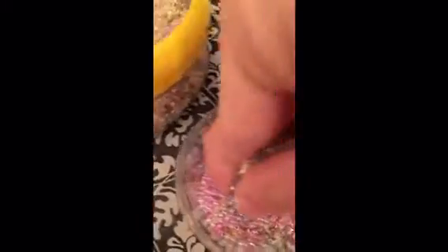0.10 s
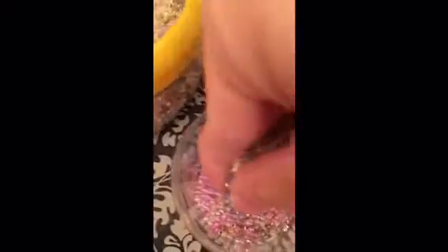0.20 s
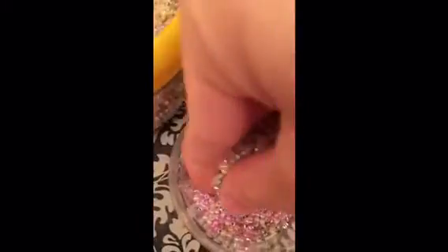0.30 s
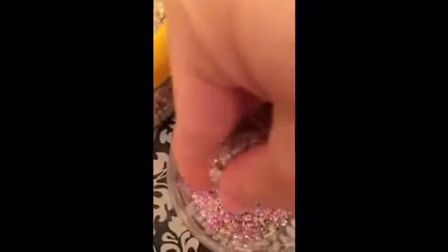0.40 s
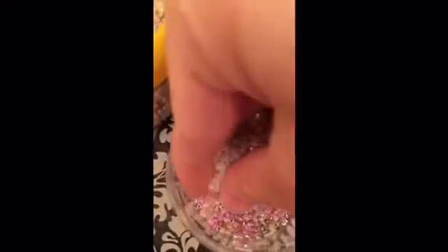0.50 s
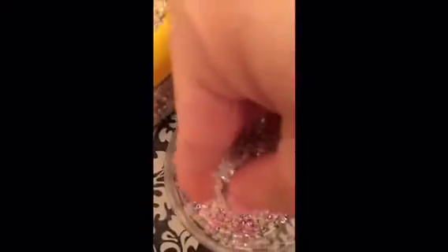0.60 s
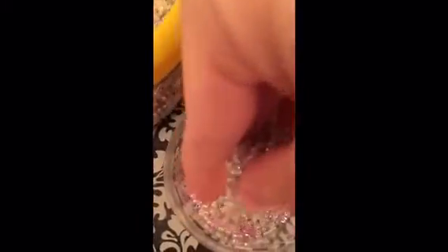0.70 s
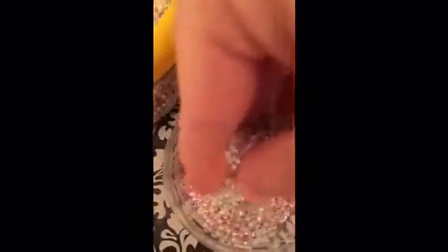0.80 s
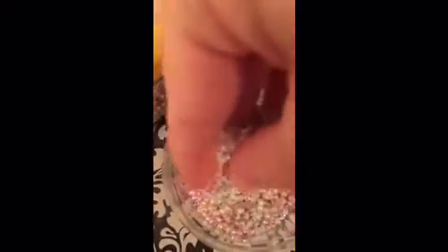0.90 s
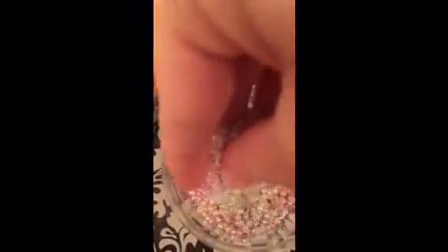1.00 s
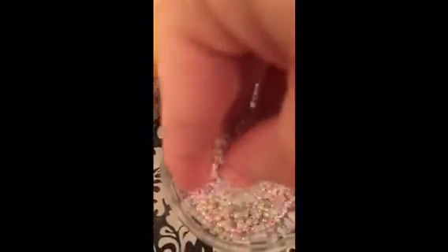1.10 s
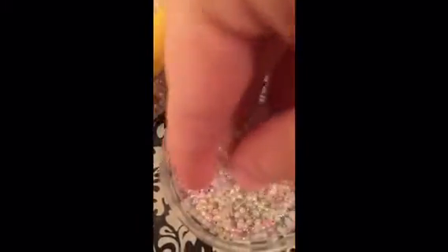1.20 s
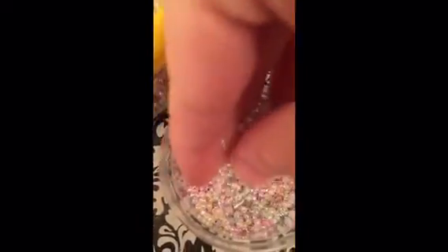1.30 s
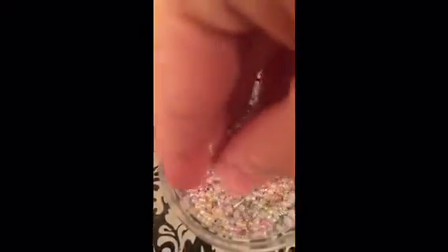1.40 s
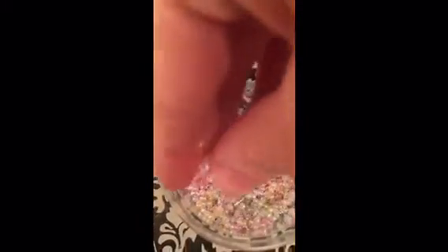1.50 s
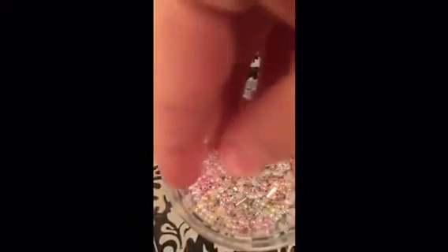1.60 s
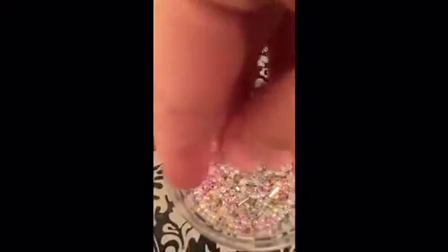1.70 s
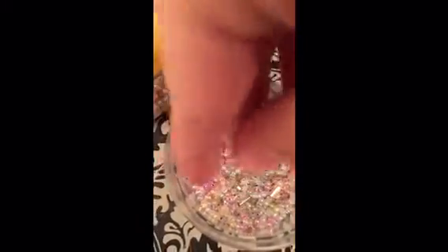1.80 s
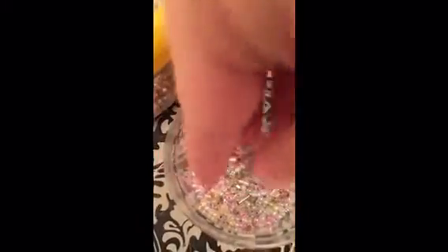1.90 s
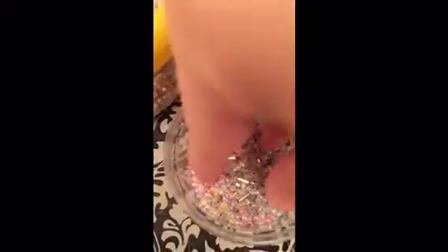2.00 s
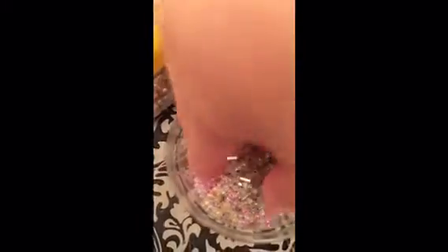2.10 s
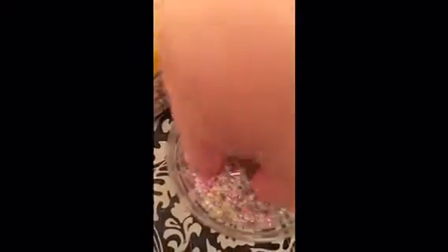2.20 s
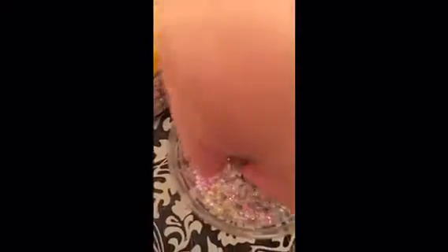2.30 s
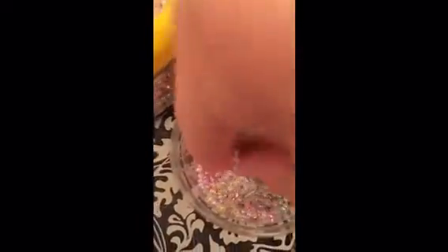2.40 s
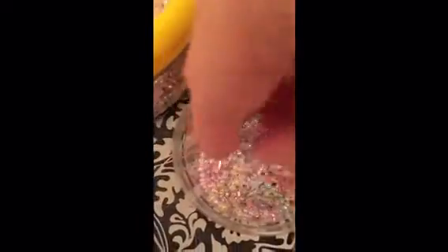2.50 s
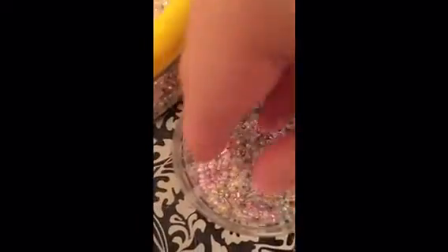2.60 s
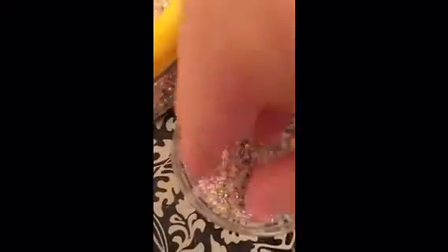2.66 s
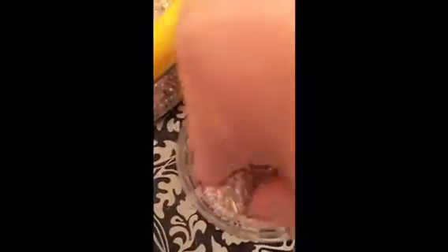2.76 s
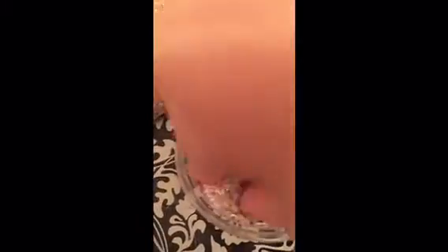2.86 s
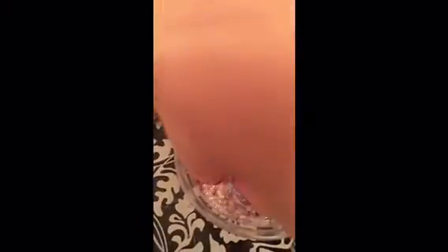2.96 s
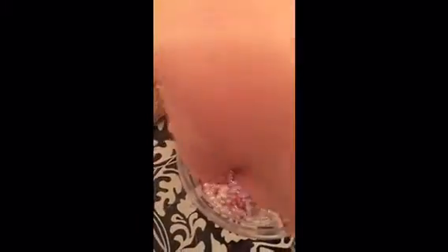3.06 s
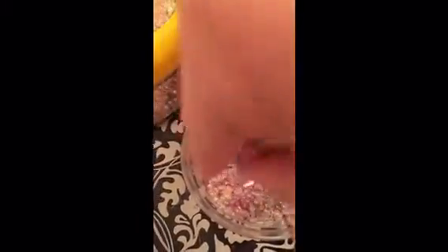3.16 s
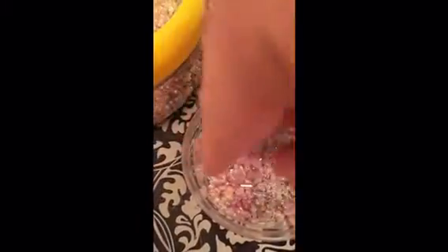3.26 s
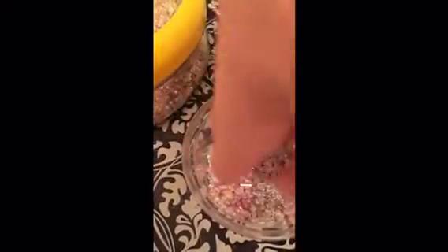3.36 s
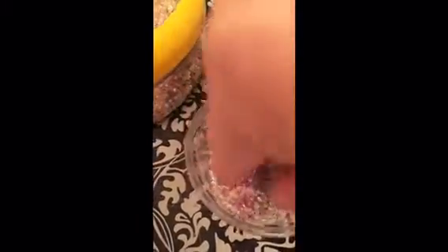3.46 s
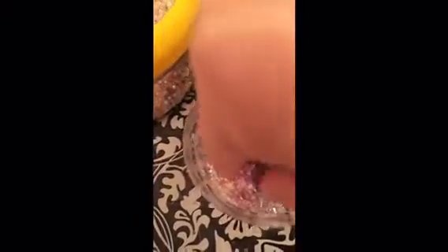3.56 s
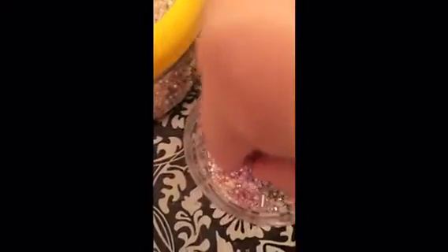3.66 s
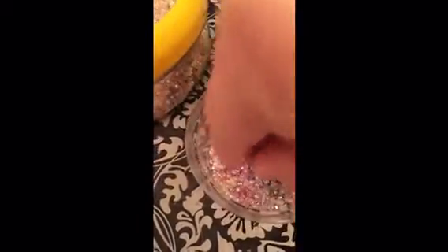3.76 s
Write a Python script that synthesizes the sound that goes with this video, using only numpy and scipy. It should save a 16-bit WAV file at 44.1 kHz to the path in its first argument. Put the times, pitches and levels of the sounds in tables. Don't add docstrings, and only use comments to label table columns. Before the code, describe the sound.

Close up in a quiet indoor room, little beads patter brightly onto beads and glass for under two seconds, then a hand stirs them in separate rustling, clicking strokes with dull fingertip thumps.

```python
import sys
import numpy as np
from scipy import signal
from scipy.fft import rfft, irfft
from scipy.io import wavfile
from scipy.ndimage import uniform_filter1d

SR = 44100
rng = np.random.default_rng(int(sys.argv[2]) if len(sys.argv) > 2 else 0)


def to_wav(sig):
    pcm = np.clip(np.atleast_2d(sig), -1, 1) * 32767
    pcm = np.round(pcm).astype(np.int16)
    wavfile.write(sys.argv[1], SR, pcm.T)


def volts_from_db(level):
    exponent = np.asarray(level, float) / 20
    return 10 ** exponent


N = 169785
CONTACT_SAMPLES = 512


def evened(x):
    return x / np.sqrt(np.mean(x ** 2) + 1e-20)


def coloured(x, points):
    table_hz, table_db = np.transpose(points)
    hz = np.fft.rfftfreq(x.shape[-1], 1 / SR)
    gain_db = np.interp(np.log(hz + 1), np.log(table_hz), table_db)
    return irfft(rfft(x) * volts_from_db(gain_db), x.shape[-1])


def filtered(x, order, hz, kind):
    return signal.sosfilt(signal.butter(order, hz, kind, fs=SR, output="sos"), x)


def drift(hz):
    noise = uniform_filter1d(rng.standard_normal(N), size=60)
    return evened(signal.lfilter([1], [1, -np.exp(-2 * np.pi * hz / SR)], noise))


def unit_energy(templates):
    return templates / np.linalg.norm(templates, axis=1, keepdims=True)


# freq_hz, level_db_per_hz
BEAD_COLOUR = [(900, -53), (2000, -19), (3500, -9.5), (6000, -0.5), (8500, 3), (11000, -4.5), (15500, -5)]


def bead_snaps(count):
    rattle_s, after_db, own_colour_db = 0.00028, -10, 2.5
    n = np.arange(CONTACT_SAMPLES)
    t = n / SR
    decay_s = rattle_s * rng.uniform(0.6, 1.6, (count, 1))
    decay = np.exp(-t / decay_s) + volts_from_db(after_db) * np.exp(-t / decay_s / 5)
    raw = np.roll(rng.standard_normal((count, CONTACT_SAMPLES)) * decay, 24, axis=1)
    own = evened(uniform_filter1d(rng.standard_normal((count, 257)), size=40, axis=1))
    raw = irfft(rfft(raw) * volts_from_db(own_colour_db * own), CONTACT_SAMPLES)
    snap = np.roll(coloured(raw, BEAD_COLOUR), -16, axis=1)
    fade_in, fade_out = np.minimum(n / 8, 1), np.minimum((CONTACT_SAMPLES - n) / 64, 1)
    return unit_energy(snap * fade_in * fade_out)


# freq_hz, width_hz, level_db
WALL_MODES = [(2050, 300, -4), (2450, 280, 4), (3500, 300, 1), (4400, 400, -4)]


def wall_knocks(count):
    spread_db, tuning_spread, low_cut_hz = 4, 0.061, 1540
    t = np.arange(CONTACT_SAMPLES)[:, None, None] / SR
    hz, width_hz, level_db = np.transpose(WALL_MODES)
    weight, tuning = rng.standard_normal((2, count, len(hz)))
    decay = volts_from_db(level_db + spread_db * weight) * np.exp(-np.pi * width_hz * t)
    modes = decay * np.sin(2 * np.pi * hz * (1 + tuning_spread * tuning) * t)
    return unit_energy(filtered(modes.sum(2).T, 2, low_cut_hz, "high"))


def contact_sound(train, knock, count=32):
    pick, out = rng.integers(0, count, N), np.zeros(N)
    varied_knock = knock * volts_from_db(2 * rng.standard_normal(N))
    for k, (snap, ring) in enumerate(zip(bead_snaps(count), wall_knocks(count))):
        out += signal.oaconvolve(train * (pick == k), snap)[:N]
        out += signal.oaconvolve(varied_knock * (pick == k), ring)[:N]
    return filtered(out, 4, 1030, "high")


def clumped_contacts(table, per_s, growth, size_db, clump_db, knock_db):
    edge_db = -30
    biggest = 2.6
    t, power = np.arange(N) / SR, np.full(N, 1e-12)
    for start_s, rise_s, hold_s, fall_s, level_db in table:
        before = (start_s + rise_s - t) / rise_s
        after = (t - start_s - rise_s - hold_s) / fall_s
        edge = np.maximum(np.maximum(before, after), 0)
        power += volts_from_db(2 * (level_db + edge_db * edge)) * (t > start_s)
    rate = per_s * (power / 0.0017) ** (growth / 2)
    clump = volts_from_db(clump_db * drift(40))
    size = volts_from_db(size_db * np.minimum(rng.exponential(1, N), biggest)) * rng.choice([-1, 1], N)
    hit = rng.random(N) < rate * clump / clump.mean() / SR
    train = hit * evened(size) * np.sqrt(power * SR / rate)
    return np.array([train, train * volts_from_db(knock_db)])


# start_s, rise_s, hold_s, fall_s, level_db
SHOWER_MOVES = [(.213, 0.0026, 0.0094, 0.018, -52), (.388, 0.0015, 0.0045, 0.0097, -20.5),
                (.43, 0.0063, 0.03, 0.065, -24), (.495, 0.017, 0.11, 0.033, -27.5),
                (.59, 0.02, 0.2, 0.25, -25.5), (.82, 0.02, 0.046, 0.078, -33),
                (.962, 0.021, 0.013, 0.082, -45), (1.003, 0.014, 0.098, 0.35, -22.5),
                (1.13, 0.037, 0.07, 0.084, -30), (1.25, 0.0095, 0.069, 0.03, -34),
                (1.34, 0.01, 0.057, 0.0192, -40), (1.468, 0.0072, 0.066, 0.053, -45),
                (1.543, 0.0013, 0.03, 0.15, -23), (1.655, 0.0045, 0.058, .012, -47),
                (1.85, 0.0017, 0.042, 0.0095, -48.5)]


def showers():
    return clumped_contacts(SHOWER_MOVES, per_s=4483, growth=0.97, size_db=7.5, clump_db=2, knock_db=-15)


# start_s, rise_s, hold_s, fall_s, level_db
STROKE_MOVES = [(2.056, 0.0047, 0.037, 0.086, -32.5), (2.07, 0.025, 0.027, 0.61, -40.5),
                (2.2, 0.021, 0.068, 0.13, -35.5), (2.34, 0.015, 0.23, 0.11, -42),
                (2.44, 0.083, 0.0068, 0.063, -26.5), (2.56, 0.01, 0.01, 0.026, -51),
                (2.64, 0.0023, 0.0029, 0.035, -48), (2.67, 0.0024, 0.0081, 0.042, -41.5),
                (2.742, 0.0021, 0.002, 0.035, -38.5), (2.772, 0.0024, 0.023, .02, -57),
                (2.794, 0.0041, 0.03, 0.081, -28.5), (2.85, 0.05, 0.14, 0.14, -38.5),
                (2.93, 0.066, 0.12, 0.5, -35.5), (3.17, 0.056, 0.034, 0.11, -30),
                (3.3, 0.033, 0.014, 0.03, -47), (3.485, 0.012, 0.049, 0.087, -29),
                (3.54, 0.042, 0.034, 0.41, -49.5), (3.64, 0.014, 0.034, 0.11, -38.5),
                (3.73, 0.02, 0.096, 0.089, -49)]


def strokes():
    return clumped_contacts(STROKE_MOVES, per_s=5003, growth=0.3, size_db=4.5, clump_db=3, knock_db=-17.5)


# start_s, rise_s, hold_s, fall_s, level_db
RUSTLE_MOVES = [
    (.225, 0.016, 0.22, .02, -68),
    (1.415, .005, .06, .02, -63),
    (1.70, 0.019, 0.2, .1, -65),
    (1.9, 0.011, 0.17, .03, -69),
    (3.41, 0.011, 0.15, 0.01, -71),
]


def rustle():
    return clumped_contacts(RUSTLE_MOVES, per_s=15000, growth=0.5, size_db=1, clump_db=-3.5, knock_db=-4.5)


# time_s, peak_db, knock_rel_db
SINGLE_BEADS = [(0.2152, -10, -8), (0.2163, -9.5, -11.5), (0.2207, -13, -13.5), (0.2255, -21, -13),
                (0.3059, -29.5, -37), (0.3913, -6.5, -5.5), (0.41, -6, -10), (0.4316, -4, -7),
                (0.976, -1.5, -6.5), (1.3851, -5.5, -27), (1.4415, -12, -24), (1.4719, -9, -10),
                (1.6919, -3, -17), (1.759, -7.5, -14.5), (1.7616, -21, -9), (1.7912, -19.5, -13),
                (1.8282, -24, -21), (1.8584, -16.5, -26), (1.8796, -3, -15), (1.8819, -4.5, -13.5),
                (1.8976, -25, -22), (1.9087, -20.5, -16), (1.926, -23.5, -21), (1.9815, -31.5, -13),
                (2.2881, -11, -20), (2.3816, -11, -13.5), (2.4144, -11, -22), (2.4699, -14.5, -8),
             (2.4877, -12.5, -24), (2.5272, -4, -25), (2.5422, -4.5, -40), (2.646, -13.5, -5.5),
             (2.6832, -9.5, -12.5), (2.7339, -11.5, -21), (2.809, -13, -5), (3.0495, -10, -27),
             (3.136, -7, -12), (3.2818, -5, -43), (3.338, -12, -23), (3.3995, -15.5, -22),
             (3.5046, -31, -15), (3.6067, -19, -25), (3.7137, -22, -12), (3.8188, -20.5, -26),
                (0.4195, -7, -17), (0.4452, -3, -5), (0.462, -10.5, -1), (0.481, -4.5, -9.5), (0.5023, -6, -9),
             (0.5577, -6, -6.5), (0.8648, -11, -3), (0.8939, -4, -18), (0.9072, -3, -21),
             (0.9645, -12, -18), (1.004, -10.5, -4), (1.2683, 0.5, -11), (1.302, -8, -24),
             (1.3457, -6.5, -23), (1.488, -4.5, -4.5), (1.498, -11, -11), (1.515, -3.5, -13),
             (1.5322, -4.5, -12), (1.5952, 3, -34), (1.836, -30, -30), (2.08, -2.5, -23)]
# time_s, peak_db, knock_rel_db
BARE_GLASS = [
    (1.6735, -17, 4),
    (1.627, -21, 3),
    (3.21, -25, 4),
]
# time_s, peak_db
SHOWER_PEAKS = [(0.3947, -18), (0.441, -11), (0.4496, -11), (0.471, -4), (0.5307, -2.5), (0.5488, -4),
                (0.5862, -1.5), (0.5975, -4), (0.6363, -1.5), (0.6703, -8), (0.7088, -1), (0.7384, -4),
                (0.7939, -13), (0.8107, -18), (0.85, -4), (0.8778, -6.5), (0.882, -10), (0.9144, -17),
                (0.9193, -27), (0.9299, -22), (0.937, -31), (0.9838, -11), (0.9898, -6.5), (1.0095, -13),
                (1.017, -24), (1.0372, -7), (1.0443, -3), (1.0598, -5), (1.1206, -4), (1.1598, -10),
                (1.1698, -7), (1.176, -7), (1.185, -4.5), (1.2013, -6), (1.2186, -12), (1.2208, -9),
                (1.2573, -7), (1.2765, -15), (1.286, -25), (1.3071, -3.5), (1.3128, -4), (1.3629, -13),
                (1.392, -22.5), (1.3984, -25), (1.4125, -29), (1.4358, -29), (1.5228, -32), (1.6022, -4),
                (1.6136, -14), (1.632, -10), (1.636, -14), (1.6777, -18), (1.7038, -30), (1.708, -32),
                (1.762, -33), (1.8514, -32), (1.867, -23), (1.8827, -27), (1.9046, -24), (1.9145, -29)]
STIR_PEAKS = [(2.0695, -9), (2.077, -9), (2.1035, -22), (2.2303, -17), (2.4186, -20), (2.4341, -20),
              (2.4923, -6), (2.5004, -13), (2.5182, -4), (2.5374, -5), (2.5592, -13), (2.5686, -13),
              (2.5733, -7.5), (2.5778, -15), (2.5824, -16), (2.5959, -18), (2.6042, -17), (2.6424, -26),
              (2.6481, -15), (2.6507, -8), (2.6728, -24), (2.6807, -27), (2.7457, -37), (2.8113, -4.5),
              (2.816, -14), (2.8235, -4), (3.0531, -8), (3.0703, -11.5), (3.079, -12), (3.1421, -16),
              (3.1997, -15), (3.2158, -9), (3.239, -19), (3.2465, -5), (3.2596, -10), (3.2747, -16),
              (3.3026, -16), (3.3232, -20), (3.3324, -13), (3.3403, -11.5), (3.3617, -27), (3.3738, -33),
              (3.3784, -34), (3.3954, -22), (3.4064, -28), (3.5108, -16), (3.5536, -26), (3.6943, -29),
              (3.7613, -28), (3.7737, -25)]


def lone_beads():
    shower_knock_db, stir_knock_db = -12.5, -24
    lag_s, bounce_s, level_db, bounce_db = 0.0006, 0.0014, 3.5, -9
    rows = SINGLE_BEADS + BARE_GLASS
    rows = rows + [(*row, shower_knock_db) for row in SHOWER_PEAKS]
    rows = rows + [(*row, stir_knock_db) for row in STIR_PEAKS]
    time_s, peak_db, knock_rel_db = np.transpose(rows)
    draws = rng.random((len(rows), 6))
    train, knock = np.zeros(N), np.zeros(N)
    for k in range(4):
        wait_s = lag_s + bounce_s * k * (0.5 + draws[:, k - 1])
        at = np.minimum(((time_s + wait_s) * SR).astype(int), N - 1)
        train[at] += volts_from_db(peak_db + level_db + k * bounce_db * (1 + draws[:, k + 2]))
        knock[at] = volts_from_db(knock_rel_db)
    return np.array([train, train * knock])


# freq_hz, width_hz, level_db
HOLLOW_MODES = [(2890, 40, -3), (3960, 900, 1), (5880, 930, -6), (6580, 250, 5), (7310, 165, -6.5),
                (9560, 410, 3.5), (10180, 530, -6), (11100, 1310, 4.5)]


def hollow(x, depth):
    hz = np.fft.rfftfreq(N, 1 / SR)

    def tuned(shift):
        gain_db = sum(db * np.exp(-0.5 * ((hz - mode_hz * shift) / width_hz) ** 2)
                      for mode_hz, width_hz, db in HOLLOW_MODES)
        return irfft(rfft(x) * volts_from_db(depth * gain_db), N)

    share = 0.5 + 0.5 * np.tanh(drift(0.75))
    return share * tuned(0.98) + (1 - share) * tuned(1.02)


def skin(train):
    level_db, centre_hz = -34.5, 1130
    push = np.sqrt(abs(uniform_filter1d(train ** 2, size=1500)))
    scrape = push ** 0.5 * rng.standard_normal(N)
    return volts_from_db(level_db) * filtered(scrape, 2, [centre_hz / 2, centre_hz * 2], "band")


# time_s, level_db
THUMP_TIMES = [
    (2.058, -48.5),
    (2.799, -49.5),
    (3.491, -51.5),
]


def thumps():
    t, level = np.arange(N) / SR, np.zeros(N)
    for time_s, level_db in THUMP_TIMES:
        decay = volts_from_db(level_db - 620 * abs(t - time_s))
        level += decay * np.clip((t - time_s) / 0.0033, 0, 1)
    return level * evened(filtered(rng.standard_normal(N), 2, [300, 1200], "band"))


# freq_hz, level_db_per_hz
AIR_COLOUR = [(25, -18), (70, 0), (140, -14.5), (300, -17.5), (420, -25.5), (700, -28), (800, -33),
              (12000, -55)]
# freq_hz, width_hz, rms_db
ROOM_HUMS = [(65.8, 10, -57.5), (125.3, 14.6, -55), (297.7, 15.4, -67), (2020, 21, -74)]


def air():
    level_db = -49.5 - 2.5 + 1.7 * drift(2.8)
    out = volts_from_db(level_db) * evened(coloured(rng.standard_normal(N), AIR_COLOUR))
    for hz, width_hz, rms_db in ROOM_HUMS:
        r = np.exp(-np.pi * width_hz / SR)
        poles = [1, -2 * r * np.cos(2 * np.pi * hz / SR), r * r]
        out += volts_from_db(rms_db) * evened(signal.lfilter([1], poles, rng.standard_normal(N)))
    return out


def scene():
    hand_in_s, open_depth, closed_depth = 2.0, 0.52, 0.82
    single, covered = lone_beads(), np.arange(N) / SR > hand_in_s
    falling = showers() + single * ~covered
    pushed = strokes() + rustle()
    beads = hollow(contact_sound(*falling), open_depth)
    beads += hollow(contact_sound(*(pushed + single * covered)), closed_depth)
    return (beads + skin(pushed[0]) + thumps() + air())[None]


# freq_hz, level_db
BAND_EDGE = [(15200, 0), (15380, -22), (15850, -36), (16000, -60)]


def microphone(dry):
    limit = 0.55
    return coloured(limit * np.tanh(dry / limit), BAND_EDGE)


def low_pass(x):
    return signal.sosfilt(signal.butter(12, 16500, fs=SR, output="sos"), x)


def record(dry):
    return low_pass(microphone(dry))


dry = scene()
out = record(dry)
to_wav(out)
```